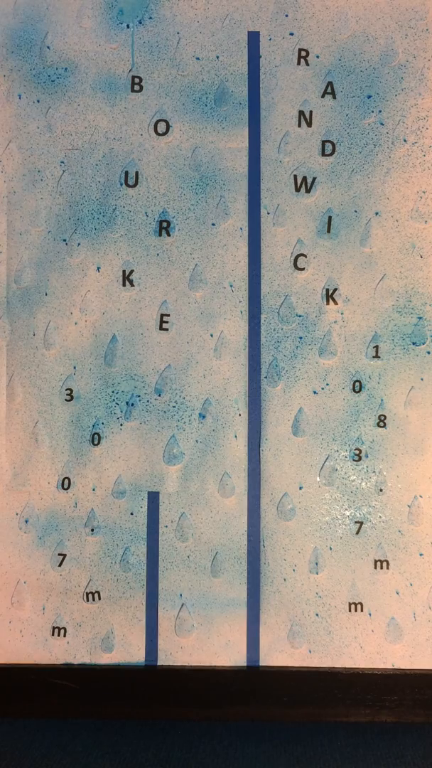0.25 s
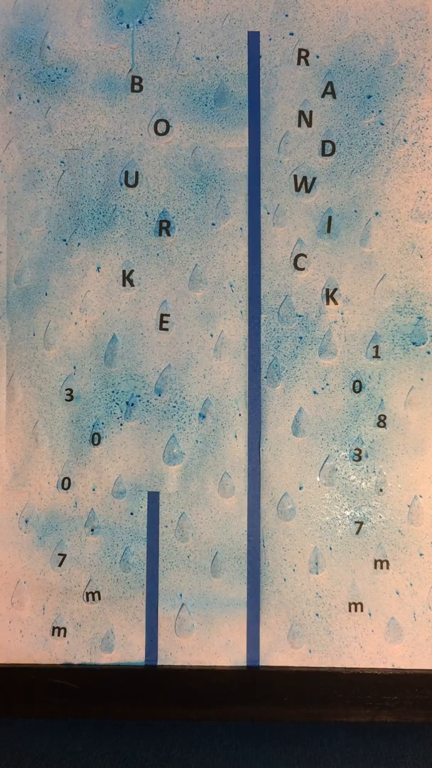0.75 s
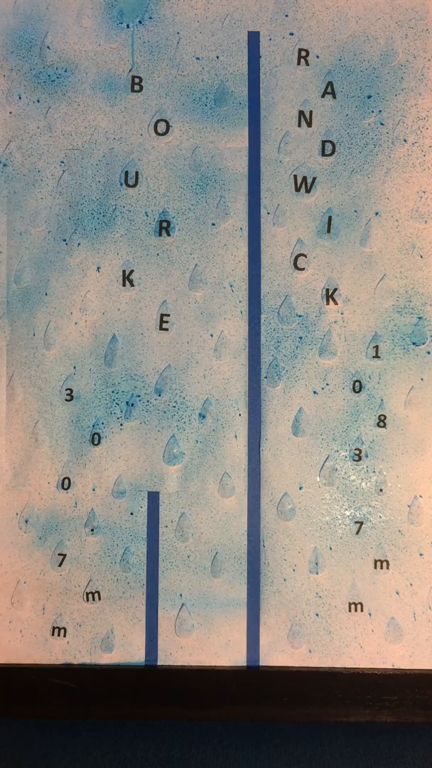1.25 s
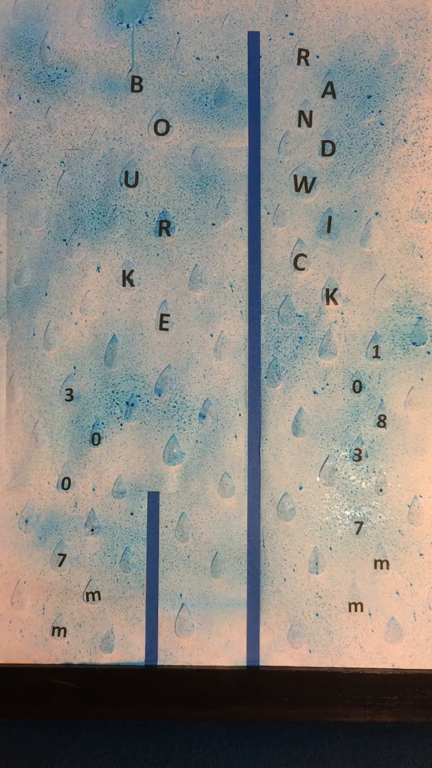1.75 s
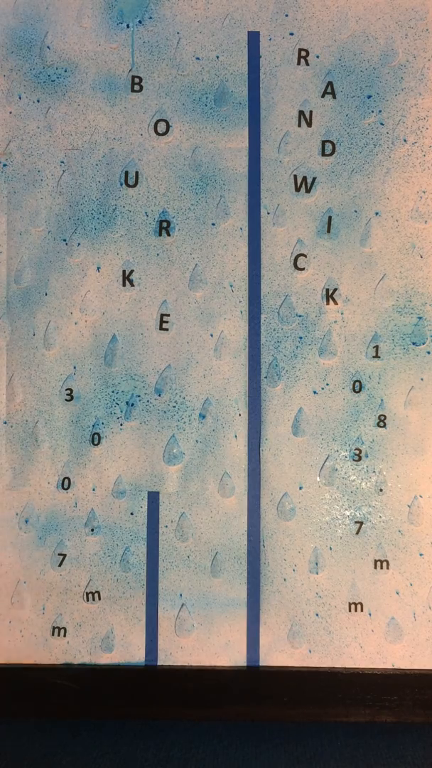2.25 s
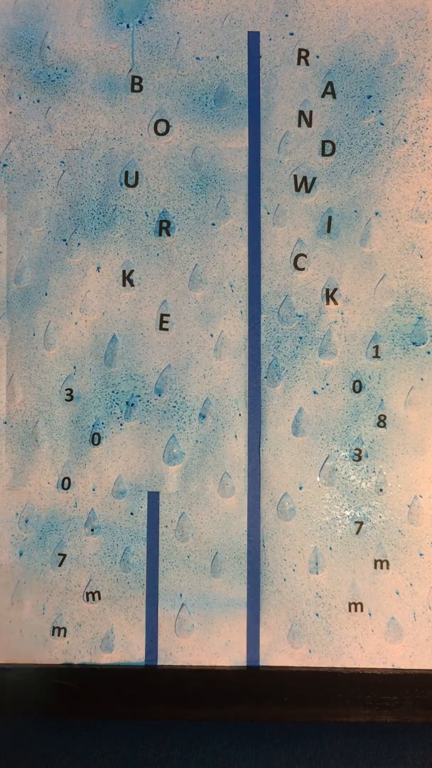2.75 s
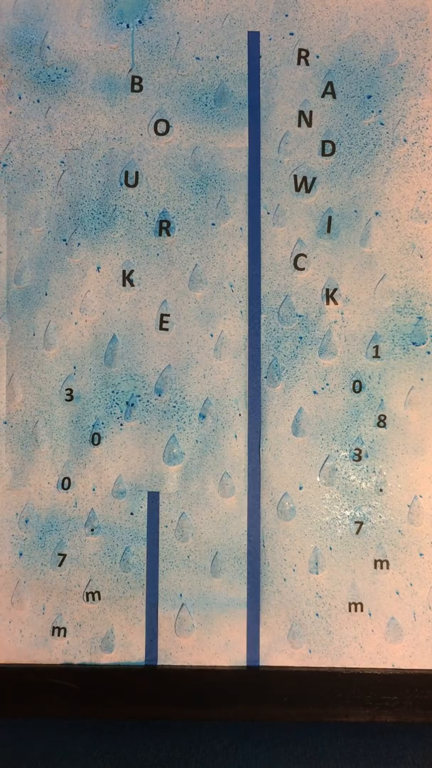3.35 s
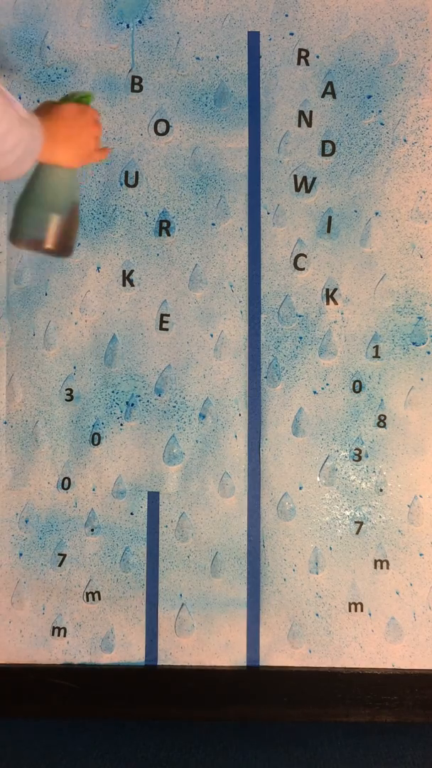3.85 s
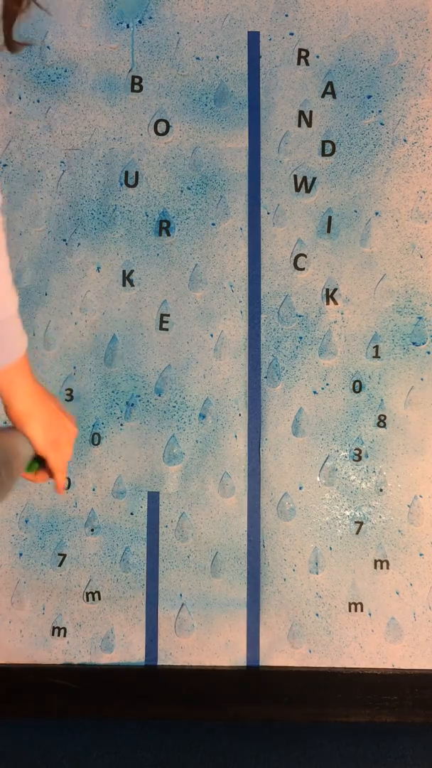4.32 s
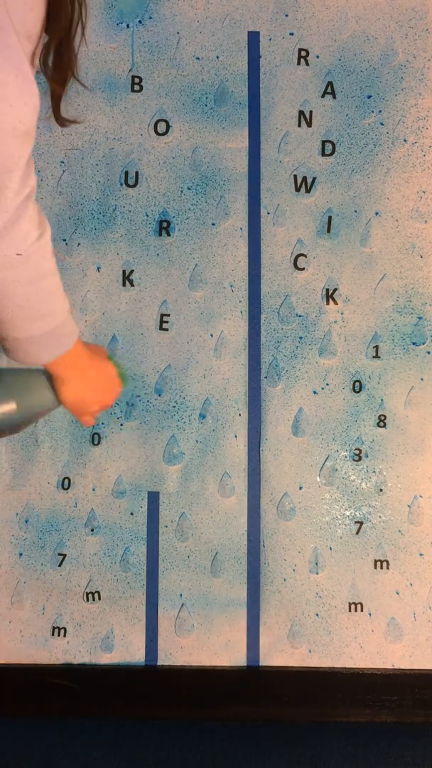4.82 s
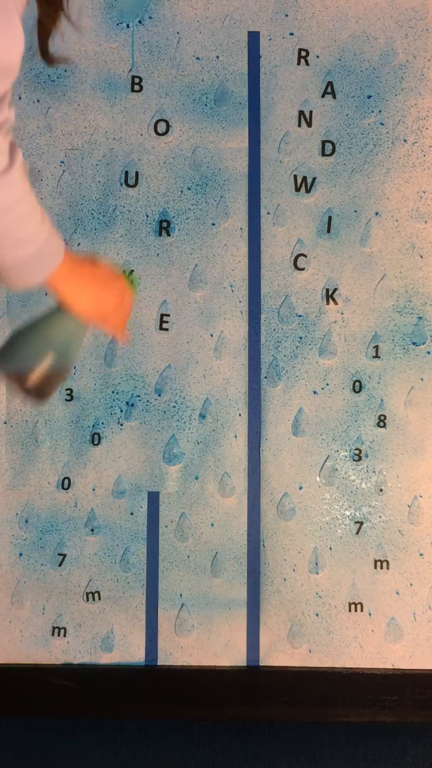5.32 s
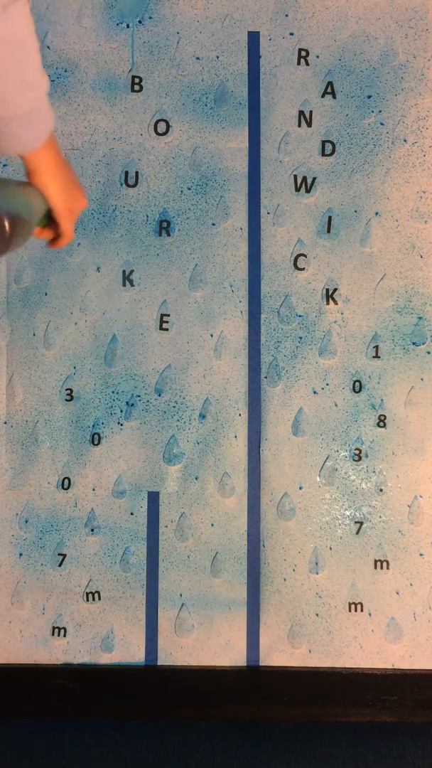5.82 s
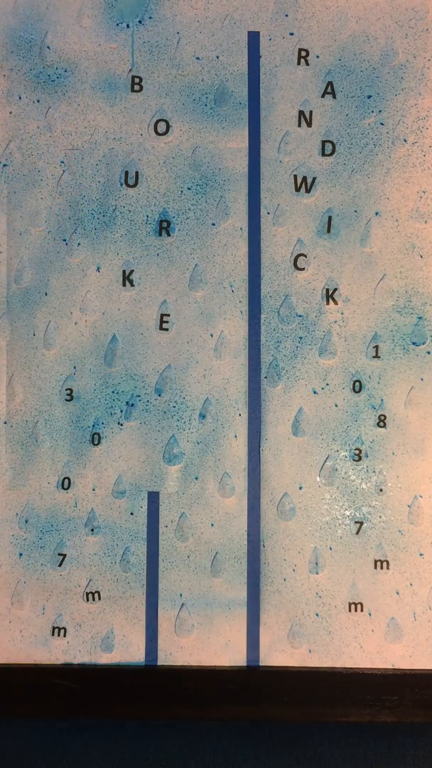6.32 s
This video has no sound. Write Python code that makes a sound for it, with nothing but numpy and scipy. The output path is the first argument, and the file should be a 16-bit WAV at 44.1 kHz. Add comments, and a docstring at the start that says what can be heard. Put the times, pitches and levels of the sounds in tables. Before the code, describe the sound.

A plastic trigger spray bottle is pumped in short hissing squirts onto an upright board, with clicks, creaks and liquid gulps between them indoors.

```python
"""A quiet room, where a plastic trigger bottle is pumped in quick strokes at an upright board.
Each squeeze is a coarse jet of drop grains, with a bright mist of finer grains that swells with the pressure.
The jet patters on the board and hums in its modes. Between squeezes filtered noise bursts make the trigger's
ticks and creaks, the air gulps and the knocks; grains make the refill fizz and the sleeve's rustle.
Diffuse reflections, soft air noise and a ventilation rumble surround it all."""
import sys
import numpy as np
from scipy import signal
from scipy.fft import rfft, irfft, next_fast_len
from scipy.io import wavfile

SR = 44100
rng = np.random.default_rng(int(sys.argv[2]) if len(sys.argv) > 2 else 0)


def master_out(mix):
    """Clip the mix to full scale and print it as 16-bit PCM to the path in sys.argv[1]."""
    frames = np.transpose(np.atleast_2d(mix))
    ceiling = np.clip(frames, -1, 1)
    pcm = np.round(ceiling * 32767).astype(np.int16)
    wavfile.write(sys.argv[1], SR, pcm)


N = 289737
TIME = np.arange(N) / SR

# squeezes of the trigger: [start/s, length/s, attack/s, coarse jet level/dB, mist level/dB,
#   mist swell at full pressure/dB, patter level re the jet/dB, nozzle fizz level/dB]
SQUEEZES = [(-.17, 0.18, .01, -52.5, -50.5, 8, -12, -55), (0.594, 0.17, 0.018, -49, -48, 9, -19, -56),
            (1.283, 0.18, 0.0089, -49, -47, 4.5, -18, -53.5),
            (1.997, 0.18, 0.0047, -48.5, -49.5, 7, -19, -61),
            (2.709, 0.17, 0.0067, -48.5, -48.5, 8, -19.5, -66.5),
            (4.149, 0.17, 0.0051, -49, -44.5, 6, -15, -62), (4.987, 0.16, 0.017, -48, -45, 6.5, -13.5, -59),
            (5.807, 0.13, 0.024, -49, -47, 7, -13, -57.5)]
# spectrum of fine mist, also of the sleeve's swish: [f/Hz, relative level/dB per Hz]
MIST_SPECTRUM = [(800, -30), (2000, -21), (3200, -7), (4300, -0.5), (5500, -1), (7000, -1), (8500, -3),
                 (10500, -3), (13000, -7), (15300, -12)]


def from_db(db):
    """Decibels to gain."""
    return 10 ** (np.asarray(db) / 20)


def rms_one(x):
    """Scale to unit rms."""
    return x / np.sqrt(np.mean(x ** 2) + 1e-20)


def colour(x, spectrum):
    """Give a steady sound a spectrum, rolled off 12 dB per octave below its first point; rms 1."""
    hz, db = np.transpose(spectrum)
    size = next_fast_len(N)
    log_hz = np.log(np.maximum(np.fft.rfftfreq(size, 1 / SR), 1))
    bass_cut = np.minimum(1, np.exp(2 * (log_hz - np.log(hz[0]))))
    gain = from_db(np.interp(log_hz, np.log(hz), db))
    return rms_one(irfft(rfft(x, size) * bass_cut * gain, size)[:N])


def drift(rate_hz):
    """Random wander in straight lines between knots at this rate; rms 1."""
    knots = rng.standard_normal(4000)
    return rms_one(np.interp(TIME * rate_hz, np.arange(len(knots)), knots))


def grains(per_s, spread_db):
    """Tiny impacts at random moments, of uneven size and random sign; rms 1."""
    size_db = spread_db * np.minimum(rng.exponential(1, N), 4)
    impacts = from_db(size_db) * rng.choice([-1, 1], N)
    return rms_one(impacts * (rng.random(N) < per_s / SR))


def gate(s, length_s, attack_s, release_s):
    """Swell exponentially up to a moment, hold, die away exponentially."""
    before = np.maximum(s - TIME, 0) / attack_s
    after = np.maximum(TIME - s - length_s, 0) / release_s
    return np.exp(-np.minimum(before + after, 20))


def resonate(x, hz, width_hz):
    """A two-pole resonance with gain 1 on its top."""
    r = np.exp(-np.pi * width_hz / SR)
    zeros = np.array([1, 0, -1]) * (1 - r * r) / 2
    poles = [1, -2 * r * np.cos(2 * np.pi * hz / SR), r * r]
    return signal.lfilter(zeros, poles, x)


def burst(decay_s, rise_s, size=12000):
    """Noise that swells quickly and dies away."""
    t = np.arange(size) / SR
    return rng.choice([-1, 1], size) * (1 - np.exp(-t / rise_s)) * np.exp(-t / decay_s)


def at_level(x, db, decay_s):
    """Scale a dying sound so that it starts near this rms level."""
    return x * from_db(db) * np.sqrt(decay_s * SR / 2 / np.sum(x ** 2))


def add(out, s, sound):
    """Mix a sound in at a moment."""
    start = max(0, int(s * SR))
    out[start:start + len(sound)] += sound[:N - start]


def spray():
    """Coarse drops patter through each squeeze while the mist swells with the pressure behind it."""
    # spectrum of the coarse jet: [f/Hz, relative level/dB per Hz]
    jet_spectrum = [(100, -46), (300, -21), (550, -10.5), (750, -24), (1000, -10), (1250, -3), (1500, 1),
                    (2200, 2), (3000, 2.5), (4500, -4.5), (8000, -5.5), (15000, -16.5)]
    # spectrum of drops on the board's dull face: [f/Hz, relative level/dB per Hz]
    patter_spectrum = [(300, -20), (550, -8.5), (720, -0.5), (900, 8), (1050, -1), (1400, -7), (3000, -15)]
    pressure_skew = 1.28  # above 1, full pressure comes after the middle of the stroke
    spit_db, spit_s, snap_s = 4, 0.035, 0.0064  # the faster a squeeze snaps open, the stronger its coarse spit
    leak_db, leak_s = -58, 0.03  # mist leaks out as the pressure builds
    wetting_db = 2.5  # rise of the patter over one stroke, as the board gets wet
    jet_release_s, mist_release_s = 0.021, 0.022

    drops = colour(grains(per_s=9000, spread_db=2.5), jet_spectrum) * from_db(2.0 + 0.65 * drift(120))
    hiss = colour(grains(per_s=30000, spread_db=1.0), MIST_SPECTRUM) * from_db(0.14 * drift(140))
    patter = colour(grains(per_s=3000, spread_db=3.5), patter_spectrum)
    out = 0
    for s, length_s, attack_s, jet_db, mist_db, swell_db, patter_db, _ in SQUEEZES:
        stroke = np.clip((TIME - s) / length_s, 0, 1)  # 0 to 1 through the squeeze
        pressure = np.sin(np.pi * stroke ** pressure_skew)
        snap = snap_s / (snap_s + attack_s)
        spit = spit_db * snap * np.exp(-stroke * length_s / spit_s)
        jet = from_db(jet_db + spit) * gate(s, length_s, attack_s, jet_release_s)
        mist = from_db(mist_db + swell_db * pressure) * gate(s, length_s, attack_s, mist_release_s)
        leak = from_db(leak_db) * gate(s, 0, leak_s, mist_release_s)
        wet = from_db(patter_db + wetting_db * (stroke - .5))
        direct = jet * (drops + wet * patter) + np.maximum(mist, leak) * hiss
        out = out + reflected(direct)
    return out


def reflected(x, count=12):
    """Board, hand and bottle throw back weak early echoes, at new delays for each squeeze as the aim moves."""
    shortest_s, longest_s, echo_db = .0004, .008, -23  # level of each echo
    lags = (SR * rng.uniform(shortest_s, longest_s, count)).astype(int)
    return x + from_db(echo_db) * sum(np.pad(x, (lag, 0))[:N] for lag in lags)


def board():
    """The jet's impact, as noise, keeps the panel's lowest modes humming."""
    # modes of the board: [f/Hz, width/Hz, level re the jet/dB]
    panel_modes = [(137.7, 12, -25.5), (253, 23, -36), (530, 600, -24.5)]
    jet = sum(from_db(db) * gate(s, length_s, attack_s, release_s=0.089)
              for s, length_s, attack_s, db, *_ in SQUEEZES)
    push = jet * rng.standard_normal(N)
    out = 0
    for hz, width_hz, db in panel_modes:
        even_out = np.sqrt(SR / (np.pi * width_hz))  # a narrow mode passes less noise
        out = out + from_db(db) * even_out * resonate(push, hz, width_hz)
    return out


def refill():
    """Liquid fizzes on in the nozzle after each squeeze, and in the valve whenever the piston travels."""
    # piston travels that draw liquid through the valve: [start/s, length/s, release/s, level/dB before trim]
    travels = [(0.221, 0.019, 0.033, -58), (0.957, 0.1, 0.02, -63.5), (1.217, 0.057, .03, -63.5),
               (1.656, 0.074, 0.024, -59.5), (1.944, .04, .02, -65.5), (2.362, 0.11, 0.02, -63.5),
               (3.01, 0.13, .025, -66.5), (4.114, 0.028, .02, -56.5), (4.48, 0.1, 0.046, -59.5),
               (5.339, 0.054, 0.069, -58)]
    # spectrum of the fizz: [f/Hz, relative level/dB per Hz]
    fizz_spectrum = [(200, -7.5), (500, -6.5), (900, -7.5), (1500, 0), (2500, -2), (5000, -3.5), (8000, -5),
                     (11000, -7.5), (15000, -15.5)]
    attack_s, nozzle_release_s = 0.011, 0.14
    valve = sum(from_db(db) * gate(s, length_s, attack_s, release_s)
                for s, length_s, release_s, db in travels)
    nozzle = sum(from_db(db) * gate(s + length_s, 0, attack_s, nozzle_release_s)
                 for s, length_s, *_, db in SQUEEZES)
    trim = from_db(-1.0 + 1.44 * drift(110))
    return np.hypot(valve, nozzle) * colour(grains(per_s=7000, spread_db=1.5), fizz_spectrum) * trim


def trigger():
    """Each slip of the plastic trigger is a bright tick that catches again a moment later."""
    # single dry ticks: [t/s, peak level/dB before trim and sharing]
    single_ticks = [(0.153, -46), (0.9682, -39), (1.039, -41), (1.223, -43), (1.6604, -39), (1.942, -45),
                    (2.324, -42.5), (3.0032, -39), (4.106, -39), (4.121, -40), (4.8724, -38),
                    (6.1725, -38.5), (6.215, -39)]
    out = np.zeros(N)
    for s, db in single_ticks + slips():
        for delay_s, share in [(0, 0.55), (.003, 0.49)]:
            slip = burst(decay_s=0.0012, rise_s=0.00031)
            tick = resonate(slip, 10300, 5000)
            tick -= 0.74 * resonate(slip, 4100, 3000)
            tick += 0.64 * resonate(slip, 1200, 900)
            add(out, s + delay_s, share * from_db(db - 3.0) * tick / np.abs(tick).max())
    return out


def slips(size=16):
    """The returning trigger sticks and slips at nearly even gaps, heard as a creak: rows of (t/s, level/dB)."""
    # creaks: [start/s, length/s, peak level/dB before trim and sharing]
    creak_runs = [(2.368, .05, -42), (3.052, .095, -41.5)]
    gap_s, jitter_s = 0.017, 0.0022
    rows = []
    for s, length_s, db in creak_runs:
        for k, late in enumerate(rng.standard_normal(size)):
            if k * gap_s < length_s:
                rows.append((s + k * gap_s + jitter_s * late, db))
    return rows


def gulps():
    """Air breaks into the bottle: an uneven splash rings the air space while a bubble sounds its own note."""
    # gulps of air and slops of liquid: [t/s, level/dB, decay/s, bubble f/Hz, bubble level re the splash/dB]
    gulp_events = [(0.207, -55, .022, 1940, -3), (1.658, -55.5, 0.021, 1490, 2.5),
                   (1.688, -46.5, 0.017, 2530, 3), (4.480, -55.5, 0.074, 1570, -11),
                   (4.520, -50, .014, 1370, -5), (4.530, -37.5, 0.0082, 2500, 1),
                   (4.545, -43, 0.024, 1770, -10), (4.673, -59, 0.011, 2500, -2.5),
                   (5.342, -55.5, 0.026, 1350, -2.5)]
    # the bottle's air space and wall: [f/Hz, width/Hz, level/dB]
    bottle_modes = [(1032, 150, -4.5), (1545, 43, 4), (2090, 270, 3.5), (2800, 470, -2.5), (3070, 520, -1),
                    (4130, 300, -1.5), (5100, 550, -5.5), (6300, 1300, -7), (7650, 2000, -11)]
    out = np.zeros(N)
    for s, db, decay_s, bubble_hz, bubble_db in gulp_events:
        splash = burst(decay_s, rise_s=.001)
        splash *= from_db(3 * drift(300)[:len(splash)])
        body = 0
        for k, (hz, width_hz, mode_db) in enumerate(bottle_modes):
            sign = (-1) ** k  # neighbouring modes in opposite phase
            body = body + sign * from_db(mode_db) * resonate(splash, hz, width_hz)
        bubble = resonate(burst(decay_s, rise_s=0.001), bubble_hz, width_hz=190)
        add(out, s, at_level(body, db, decay_s) + at_level(bubble, db + bubble_db, decay_s))
    return out


def rings():
    """Light contacts wake the spring or the shell; each hit has its own brightness, which tilts the modes."""
    # the trigger's spring: [f/Hz, width/Hz, level/dB before the tilt]
    spring_modes = [(2010, 1000, -10), (4300, 940, -7), (5050, 340, 1.5)]
    # pings of the spring as it seats: [t/s, level/dB, decay/s, brightness/dB per octave]
    spring_pings = [(1.039, -56, 0.0052, 7), (1.221, -55, 0.0036, 5), (3.272, -51.5, 0.011, -1.5),
                    (4.459, -59, .035, 4)]
    # the bottle's shell: [f/Hz, width/Hz, level/dB before the tilt]
    shell_modes = [(294, 42, 0.5), (736, 180, -3.5), (1230, 260, -4), (3450, 1200, -14.5),
                   (7500, 1300, -17)]
    # liquid knocking against the shell: [t/s, level/dB, decay/s, brightness/dB per octave]
    shell_knocks = [(4.483, -54, 0.027, -0.5), (4.518, -56.5, 0.065, 2), (4.548, -49.5, 0.018, -0.5),
                    (4.873, -58, 0.041, 0)]
    out = np.zeros(N)
    for modes, hits in [(spring_modes, spring_pings), (shell_modes, shell_knocks)]:
        for s, db, decay_s, bright_db in hits:
            knock = burst(decay_s, rise_s=0.0007)
            body = 0
            for hz, width_hz, mode_db in modes:
                ring = resonate(resonate(knock, hz, width_hz), hz, 3 * width_hz)
                body = body + from_db(mode_db + bright_db * np.log2(hz)) * ring
            add(out, s, at_level(body, db, decay_s))
    return out


def sleeve():
    """Cloth rubs in uneven lumps, with a fine swish above, as the arm speeds up and slows down."""
    # arm movements: [fastest moment/s, half length/s, dull rub level/dB before trim, bright swish level/dB]
    arm_moves = [(.57, .05, -65.5, -78), (1.018, 0.19, -69, -72.5), (3.556, 0.085, -72.5, -70.5),
                 (6.09, 0.24, -70.5, -64.5), (6.39, .1, -62.5, -76)]
    # spectrum of the dull rubbing: [f/Hz, relative level/dB per Hz]
    rub_spectrum = [(100, -2.5), (240, -2), (600, -2.5), (1000, -4), (2000, -4.5), (3500, -7.5),
                    (7000, -16), (15000, -45)]
    rub, swish = 0, 0
    for s, half_s, rub_db, swish_db in arm_moves:
        speed = 1 / np.cosh(np.clip((TIME - s) / half_s, -20, 20))
        rub = rub + from_db(rub_db) * speed
        swish = swish + from_db(swish_db) * speed
    lumps = from_db(2.0 + 2 * drift(45))
    dull = colour(grains(per_s=2500, spread_db=2.0), rub_spectrum) * lumps
    bright = colour(grains(per_s=12000, spread_db=4.0), MIST_SPECTRUM)
    return rub * dull + swish * bright


def room(x):
    """Diffuse reflections: a decaying noise tail of unit energy, dulled by the walls."""
    t60_s, first_s, wall_hz, size = 0.19, 0.01, 7000, 22050
    t = np.arange(size) / SR
    tail = rng.standard_normal(size) * from_db(-60 * t / t60_s) * (t > first_s)
    tail = signal.sosfilt(signal.butter(1, wall_hz, fs=SR, output="sos"), tail)
    return signal.fftconvolve(x, tail / np.sqrt(np.sum(tail ** 2)))[:N]


def room_tone():
    """Soft air noise over a wavering ventilation rumble, which is noise in the room's low modes."""
    # the rumble's room modes: [f/Hz, width/Hz, rms level/dB]
    rumble_modes = [(52.6, 14, -78), (90.6, 9.4, -77.5), (134.4, 3.9, -77.5)]
    # spectrum of the air noise: [f/Hz, relative level/dB per Hz]
    air_spectrum = [(12, -52), (22, -28), (45, -13), (139, -9), (220, -14), (457, -17.5), (713, -21),
                    (1240, -22), (1640, -23), (2770, -27.5), (7000, -29.5), (11000, -30.5), (15000, -36)]
    air_db = -70  # rms
    rumble = 0
    for hz, width_hz, db in rumble_modes:
        draught = resonate(rng.standard_normal(N), hz, 5 * width_hz)
        rumble = rumble + from_db(db) * rms_one(resonate(draught, hz, width_hz))
    return rumble + from_db(air_db) * colour(rng.standard_normal(N), air_spectrum)


def scene():
    """Bottle, board and sleeve in the room."""
    near = spray() + board() + refill() + trigger() + gulps() + rings() + sleeve()
    room_db = -17  # reflections re the near sound
    return (near + from_db(room_db) * room(near) + room_tone())[None]


def record(dry):
    """The small microphone loses the deepest bass; the top is cut steeply."""
    low_cut_hz, top_cut_hz = 29, 15450
    thin = signal.sosfilt(signal.butter(2, low_cut_hz, "high", fs=SR, output="sos"), dry)
    return signal.sosfilt(signal.ellip(12, .2, 70, top_cut_hz, fs=SR, output="sos"), thin)


dry = scene()
out = record(dry)
master_out(out)
```